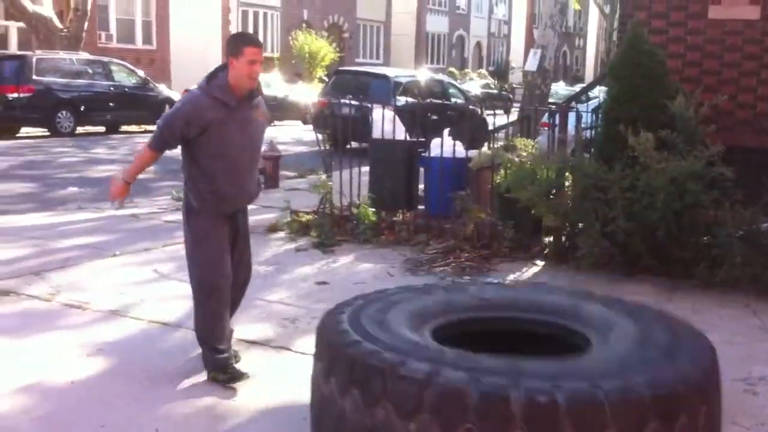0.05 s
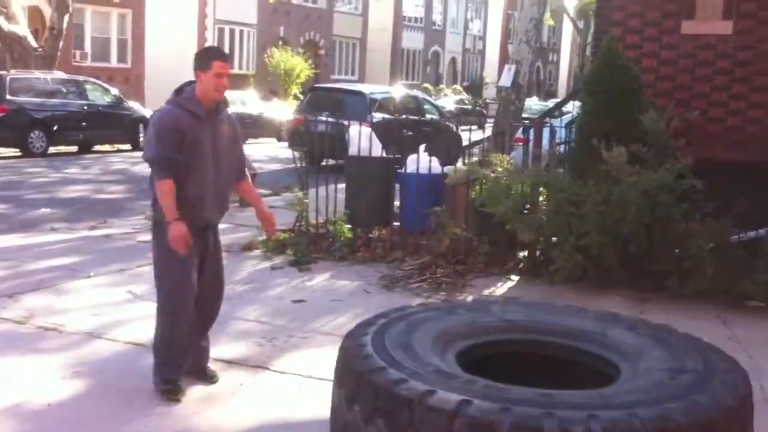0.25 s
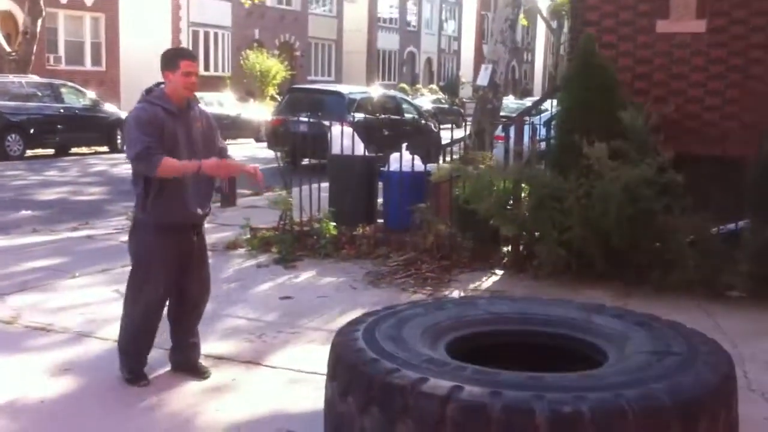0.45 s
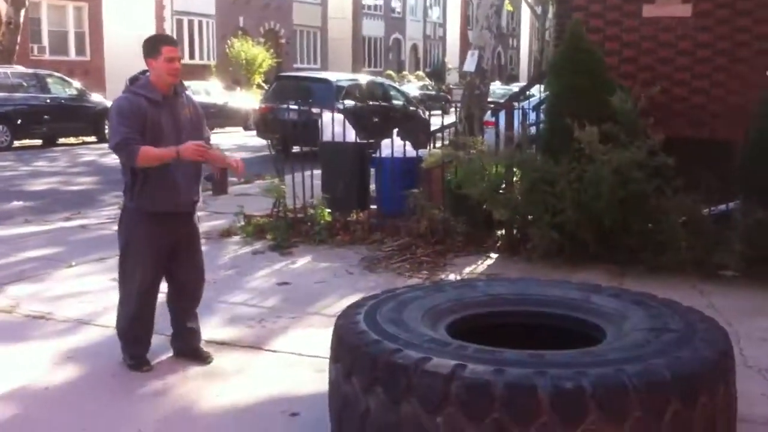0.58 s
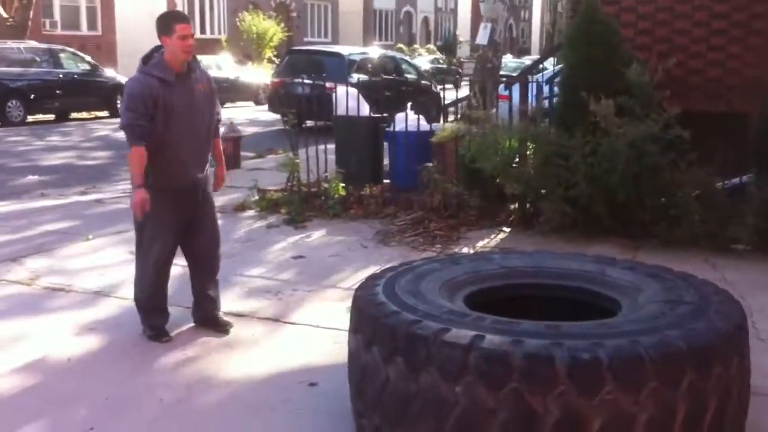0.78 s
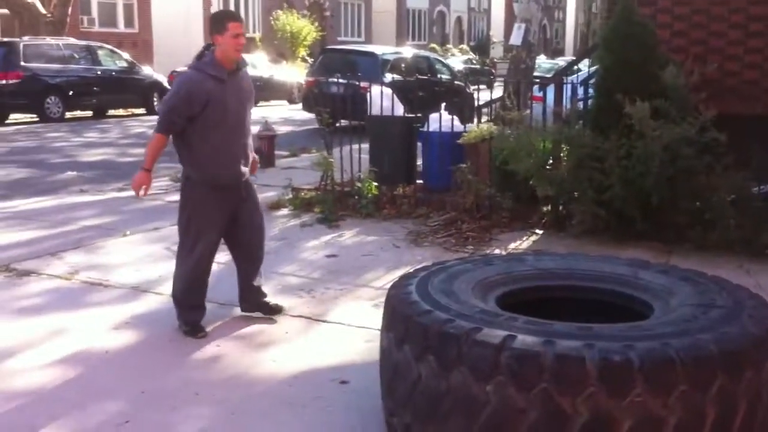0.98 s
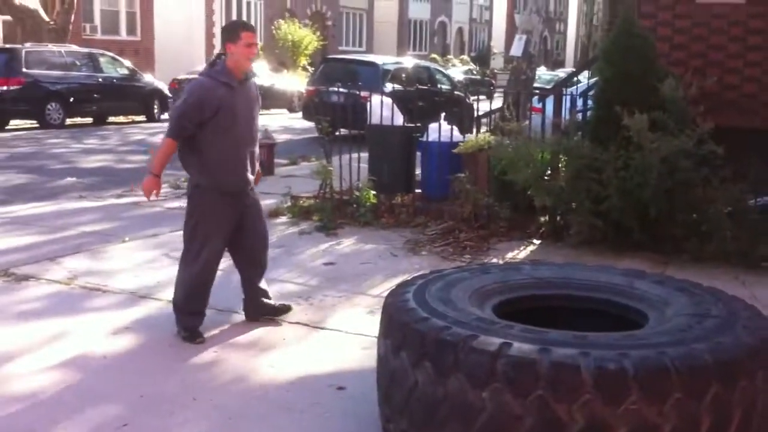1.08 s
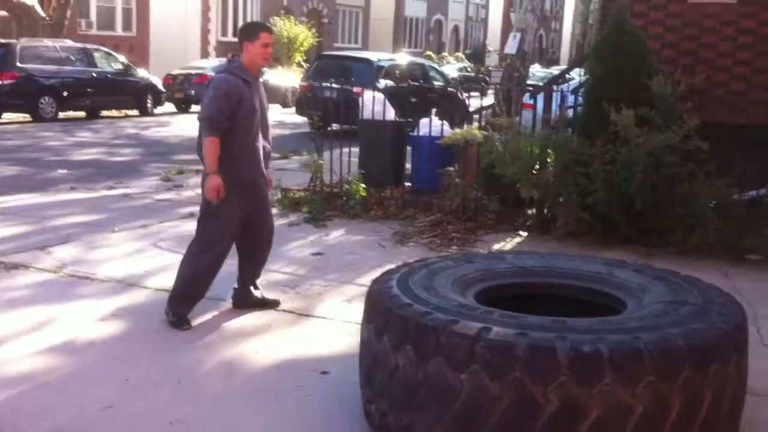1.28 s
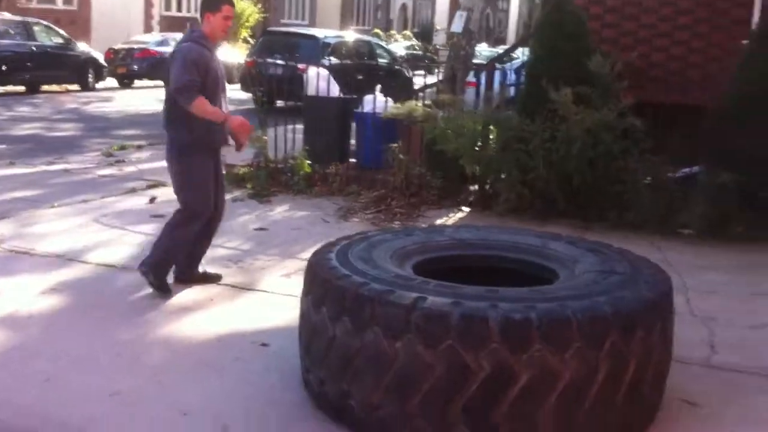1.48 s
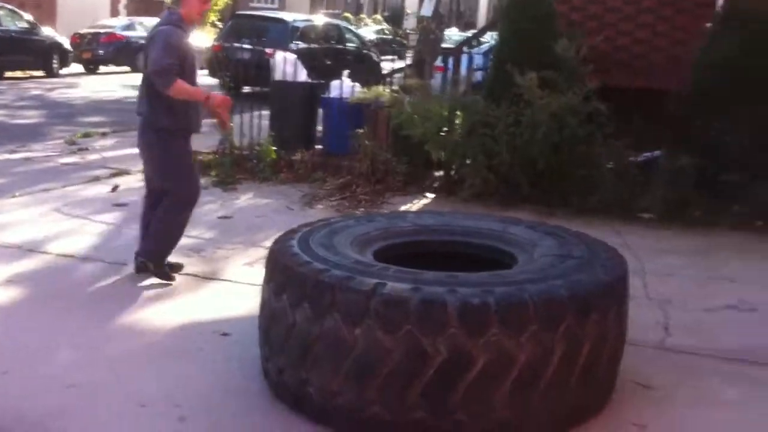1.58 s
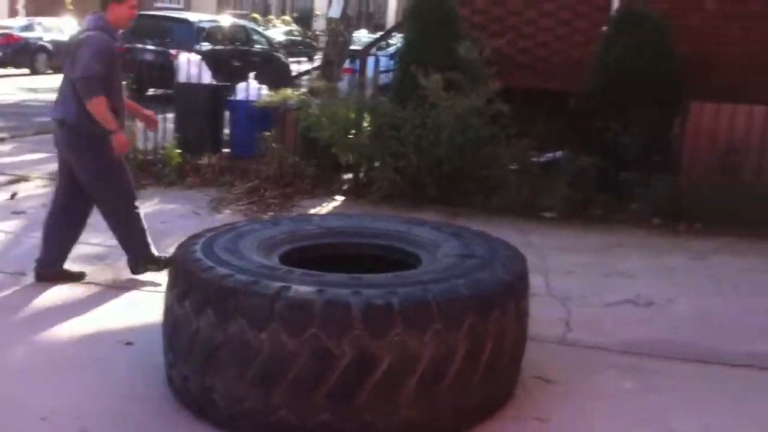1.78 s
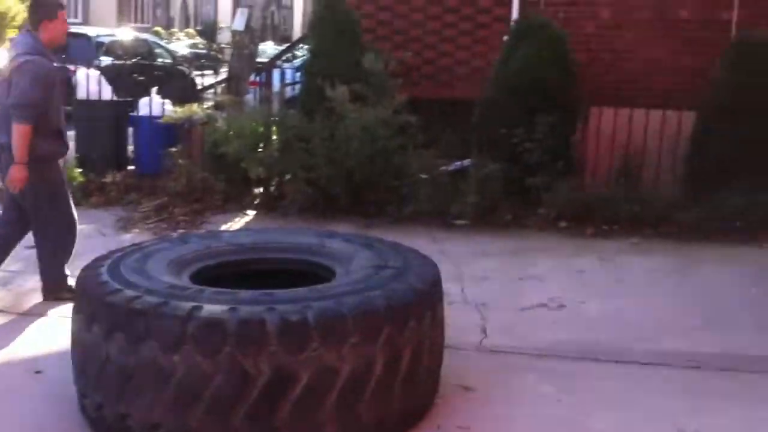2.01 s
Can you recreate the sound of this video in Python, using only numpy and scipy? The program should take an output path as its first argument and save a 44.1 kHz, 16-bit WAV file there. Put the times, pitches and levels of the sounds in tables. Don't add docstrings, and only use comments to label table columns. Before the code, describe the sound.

Outdoors on a quiet street, a heavy tyre drops with a cracking double smack and short gritty rebound; the echo fades into a dull hum, with small shoe squeaks and scrapes after, caught by a phone.

```python
import sys
import numpy as np
from scipy import signal
from scipy.fft import rfft, irfft
from scipy.io import wavfile
from scipy.ndimage import uniform_filter1d

SR = 44100
rng = np.random.default_rng(int(sys.argv[2]) if len(sys.argv) > 2 else 0)


def convert_level_to_amplitude(level_db):
    exponent = np.asarray(level_db, float) / 20
    return 10 ** exponent


def generate_wav(sig):
    pcm = np.round(np.clip(np.atleast_2d(sig).T, -1, 1) * 32767).astype(np.int16)
    wavfile.write(sys.argv[1], SR, pcm)


N = 90404
T = np.arange(N) / SR
SLAM_S = .229
SINCE_SLAM = np.maximum(T - SLAM_S, 0)


def evened(x):
    return x / np.sqrt(np.mean(x ** 2) + 1e-20)


def read(points, hz):
    f, value = np.transpose(points)
    return np.interp(np.log(hz + 1), np.log(f + 1), value)


def band(x, hz, width_hz):
    turn = np.exp(2j * np.pi * hz * np.arange(len(x)) / SR)
    r = np.exp(-np.pi * width_hz / SR)
    return 2 * (turn * signal.lfilter([1 - r], [1, -r], x / turn)).real


def resonant_hiss(hiss, hz, width_hz):
    once = band(hiss, hz, width_hz)
    return evened(band(once, hz, width_hz))


def hump(middle, rise, fall):
    return np.exp(-((T - middle) / np.where(T < middle, rise, fall)) ** 2)


def wander(size, passes=1):
    x = rng.standard_normal(N)
    for _ in range(passes):
        x = uniform_filter1d(x, size=size)
    return evened(x)


def noise(colour, size, patchy_db, t60=None):
    hop, hz = size // 4, np.fft.rfftfreq(size, 1 / SR)
    a, b, patches = rng.standard_normal((N // hop + 5, len(hz), 3)).T
    patches = uniform_filter1d(patches, size // 64, 0)
    patches = evened(uniform_filter1d(patches, 8192 // size, 1))
    z = (a + 1j * b) * convert_level_to_amplitude(read(colour, hz)[:, None] + patchy_db * patches)
    steady = signal.istft(z, nperseg=size, noverlap=size - hop)[1]
    scale = np.sqrt(np.mean(steady ** 2))
    if t60 is not None:
        late = np.maximum(np.arange(z.shape[1]) * hop / SR - SLAM_S, 0)
        z = z * convert_level_to_amplitude(-60 * late / read(t60, hz)[:, None])
    return signal.istft(z, nperseg=size, noverlap=size - hop)[1][:N] / scale


def knocks(rows, snap_db, growth):
    hiss, edges, out = rng.standard_normal(N), np.zeros(N), np.zeros(N)
    for s, db, hz, ring in rows:
        out += convert_level_to_amplitude(db) * hump(s, ring, 1.2 * ring) * np.cos(2 * np.pi * hz * (T - s))
        snap_s = min(.0008, ring)
        edges += convert_level_to_amplitude(growth * db + snap_db) * hump(s, snap_s, snap_s) * hiss
    edge_band = signal.butter(3, [2500, 9500], "band", fs=SR, output="sos")
    return out + signal.sosfilt(edge_band, edges)


# frequency in Hz, level in dB.
HUSH_COLOUR = [(90, -4.5), (200, 4), (400, -5.5), (2500, -7.5), (6300, -13.5), (8800, -15.5), (11500, -28),
               (15500, -34)]


def street_hush():
    drop_db, quick_db, recover_s, creep_db_per_s = -5, -10.5, 0.34, 0.92
    duck_db = drop_db + quick_db * np.exp(-SINCE_SLAM / recover_s) + creep_db_per_s * SINCE_SLAM
    duck_db = duck_db * (1 - np.exp(-SINCE_SLAM / .01))
    return convert_level_to_amplitude(-47.5) * noise(HUSH_COLOUR, size=1024, patchy_db=0.98) * convert_level_to_amplitude(duck_db)


def gust():
    middle_s, length_s = 0.62, 0.13
    rumble = resonant_hiss(rng.standard_normal(N), 55, 25)
    return convert_level_to_amplitude(-55) * hump(middle_s, length_s, length_s) * rumble


# peak in seconds, level in dB, pitch in Hz, ring in seconds.
GRIT_TICKS = [
    (.809, -43, 5500, 0.00043),
    (1.329, -41, 4860, .0004),
    (1.340, -38, 4800, 0.00056),
    (1.351, -37, 4100, 0.00021),
    (1.361, -35, 3900, 0.00035),
    (1.3960, -33, 4800, 0.00033),
    (1.4737, -32.5, 5270, 0.00022),
    (1.479, -47, 8700, 0.00054),
]


def grit_ticks():
    return knocks(GRIT_TICKS, snap_db=-0.5, growth=1)


# middle in seconds, level in dB, pitch in Hz, length in seconds.
SOLE_SQUEAKS = [
    (1.14, -59, 3050, 0.0093),
    (1.166, -53, 2190, 0.014),
    (1.17, -53.5, 4530, 0.034),
    (1.188, -48, 1860, 0.0093),
    (1.21, -51.5, 4230, .018),
    (1.261, -45.5, 2410, 0.0035),
]


def sole_squeaks():
    hiss, out = rng.standard_normal(N), np.zeros(N)
    for s, db, hz, length in SOLE_SQUEAKS:
        out += convert_level_to_amplitude(db) * hump(s, length, length) * resonant_hiss(hiss, hz, 400)
    return out


# middle in seconds, level in dB,
# rise in seconds, fall in seconds, brightness in dB per octave (played 4.3 times as steep).
DRAGS = [(.12, -54, 0.37, 0.18, 0.5), (0.226, -36.5, 0.0033, 0.016, 4.5), (.232, -23, 0.0035, 0.0074, -1),
         (.228, -35.5, 0.0012, .002, 2), (.36, -43.5, 0.047, 0.051, -1.33),
         (.262, -35, 0.0068, 0.021, -1.5), (0.283, -33.5, 0.011, 0.019, -1),
         (0.454, -42.5, 0.032, 0.018, 2.5), (0.488, -52, 0.031, 0.09, 1), (.41, -46, 0.012, 0.0076, -1.5),
         (.45, -35.5, 0.038, 0.031, -2), (1.17, -47, 0.023, 0.051, 1.5), (1.27, -51, 0.044, 0.094, 1),
         (1.36, -48.5, 0.018, 0.017, 2), (1.405, -53.5, 0.014, 0.029, 1.5),
         (1.477, -52.5, 0.0065, 0.013, 2.5), (1.83, -56.5, 0.0097, 0.01, 1.5),
         (1.87, -57, 0.013, 0.016, 3.5)]
# frequency in Hz, level in dB.
GRIT_COLOUR = [(300, 1), (1200, -3.5), (2000, 11), (4300, 4.5), (6500, -6), (8800, -2), (11500, -23.5),
               (15000, -18)]


def scuffs():
    grains = convert_level_to_amplitude(2.1 * wander(40))
    grit = rfft(noise(GRIT_COLOUR, size=256, patchy_db=1.5) * grains)
    octaves = np.log2(np.fft.rfftfreq(N, 1 / SR) / 4000 + 0.03)
    out = np.zeros(N)
    for middle, db, rise, fall, bright_db in DRAGS:
        tilted = irfft(grit * convert_level_to_amplitude(4.3 * bright_db * octaves), N)
        out += convert_level_to_amplitude(db) * hump(middle, rise, fall) * evened(tilted)
    return out


# frequency in Hz, level in dB.
FAR_COLOUR = [(100, 7), (250, 3.5), (800, -2), (2000, -4), (4000, -18), (8000, -36), (12000, -55)]
# frequency in Hz, t60 in seconds.
FAR_DECAY = [(60, 0.5), (300, 1.33), (1000, 1.53), (2500, 1.78), (6000, 0.91)]


def far_echo():
    tail = noise(FAR_COLOUR, size=512, patchy_db=2.0, t60=FAR_DECAY)
    return convert_level_to_amplitude(-28) * tail * (1 - np.exp(-SINCE_SLAM / 0.042))


# frequency in Hz, level in dB.
NEAR_COLOUR = [(100, -39), (300, 6), (800, 0.5), (1800, 1), (4000, -9.5), (6000, -44), (9000, -40),
               (12000, -44)]
# frequency in Hz, t60 in seconds.
NEAR_DECAY = [(100, 0.51), (400, 0.39), (1500, 0.29), (5000, 0.29), (12000, 0.04)]


def near_echo():
    lumps = convert_level_to_amplitude(1.0 * wander(120))
    tail = noise(NEAR_COLOUR, size=256, patchy_db=2.0, t60=NEAR_DECAY)
    return convert_level_to_amplitude(-18.5) * lumps * tail * (1 - np.exp(-(SINCE_SLAM / 0.004) ** 2))


# frequency in Hz, level in dB, t60 in seconds,
# beat rate in Hz, moment in seconds when the beat is loudest.
CARCASS_MODES = [(139.1, -35, 5.5, 0.92, 0.37), (225, -40.5, 6.24, 1.0, 0.94), (316, -46, 5.44, 0.88, 1),
                 (432, -39, 1.47, 0.27, 0.45), (537, -39, 0.51, .5, 0.12), (618, -41.5, 1.8, 0.21, 1),
                 (684, -42.5, 2.2, 0.34, 0.76), (765, -46.5, 3.44, 0.43, 0.9), (860, -44.5, 3.1, 0.76, 1),
                 (862, -45.5, 3, 0.5, 0.93), (927, -43.5, 1.7, 0.74, 0.69), (1030, -47, 2.3, 0.66, 0.7)]


def carcass():
    beat_depth, rise_s, waver_db_per_khz = .72, .012, 2.6
    out = np.zeros(N)
    for hz, db, t60, beat_hz, loudest in CARCASS_MODES:
        twin = (1 + beat_depth * np.exp(2j * np.pi * beat_hz * (T - loudest))) / (1 + beat_depth)
        tone = np.exp(2j * np.pi * (hz - beat_hz / 2) * SINCE_SLAM)
        waver_db = waver_db_per_khz * hz / 1000 * wander(2500, passes=2)
        out += convert_level_to_amplitude(db - 60 * SINCE_SLAM / t60 + waver_db) * (twin * tone).imag
    return out * (1 - np.exp(-SINCE_SLAM / rise_s))


# peak in seconds, level in dB, pitch in Hz, ring in seconds.
AIR_THUMPS = [
    (.2380, -13.5, 304, 0.0045),
    (.2540, -20.5, 242, .008),
    (0.23, -37, 75, 0.022),
    (0.451, -33, 226, .012),
    (.4000, -38.5, 420, 0.013),
    (.285, -31, 327, 0.0085),
    (.365, -37, 240, 0.011),
    (.445, -35, 285, 0.008),
    (.41, -37.5, 195, 0.02),
    (.250, -28, 149, 0.013),
]


def air_thumps():
    return knocks(AIR_THUMPS, snap_db=-24, growth=2.2)


# peak in seconds, level in dB, pitch in Hz, ring in seconds.
SIDEWALL_SLAPS = [(.2290, -12, 1000, .0007), (.2323, -9, 650, .0010), (.2353, -3, 1790, .0011),
                  (.2345, -6, 1150, .0007), (.2359, -6, 2500, .0005), (.2350, -12, 3800, .0005),
                  (.2418, -17, 1900, .0015), (.2488, -2, 850, .0006), (.2487, -6, 2700, .0004),
                  (.2520, -14, 600, .001), (.2572, -12, 1500, .0006), (.2813, -11, 1400, .0004)]


def sidewall_slaps():
    return knocks(SIDEWALL_SLAPS, snap_db=-16, growth=2.15)


def scene():
    background = street_hush() + gust()
    feet = grit_ticks() + sole_squeaks() + scuffs()
    tyre = far_echo() + near_echo() + carcass() + air_thumps() + sidewall_slaps()
    return (background + feet + tyre)[None]


def band_limit(x):
    return signal.sosfilt(signal.butter(12, 15850, fs=SR, output="sos"), x)


def record(dry):
    overload, bass_cut_hz, edge_hz = .72, 110, 15700
    thin = signal.sosfilt(signal.butter(2, bass_cut_hz, "high", fs=SR, output="sos"), dry)
    held = thin / (1 + abs(thin / overload) ** 4) ** .25
    treble_limit = signal.firwin(255, edge_hz, window=("kaiser", 8), fs=SR)
    finished = signal.oaconvolve(held, treble_limit[None], "same")
    return band_limit(finished)


dry = scene()
out = record(dry)
generate_wav(out)
```